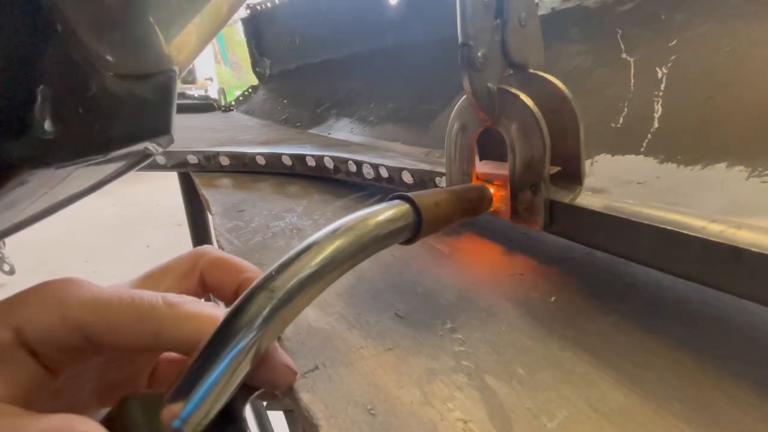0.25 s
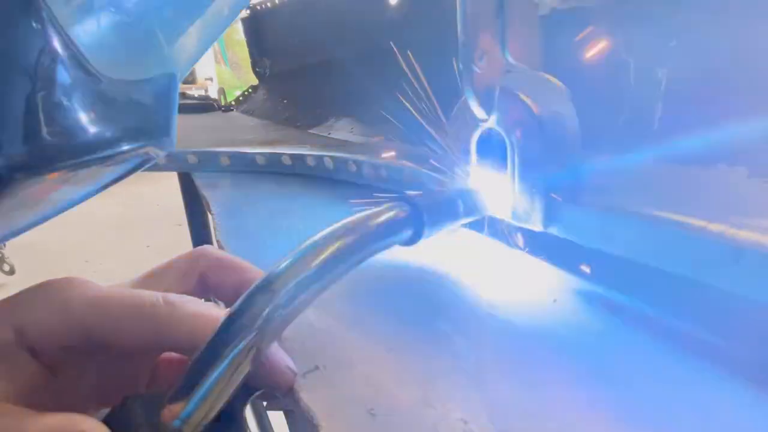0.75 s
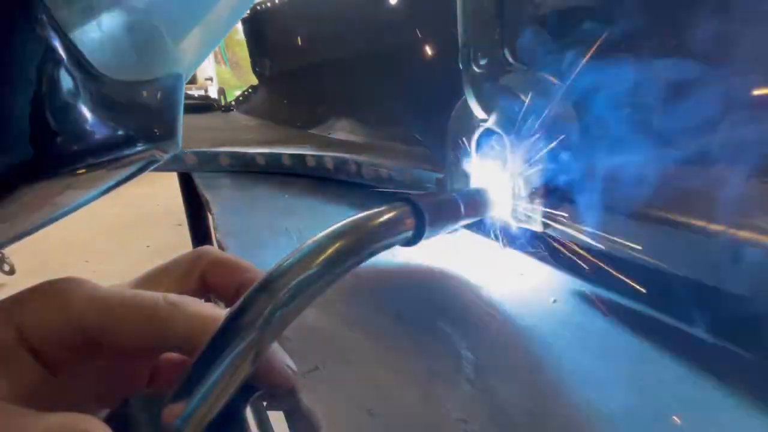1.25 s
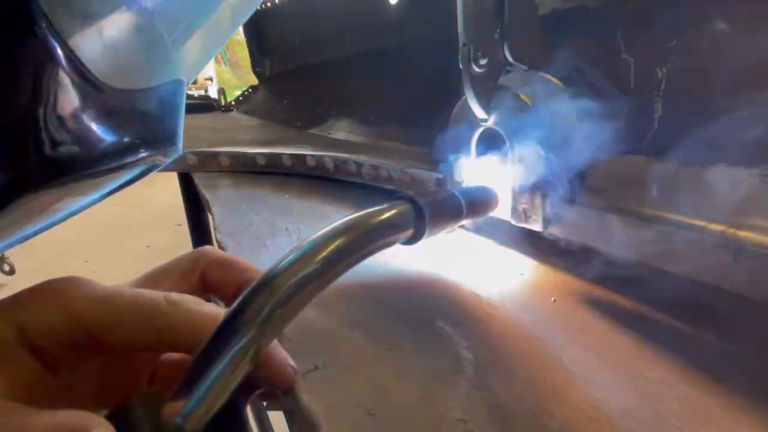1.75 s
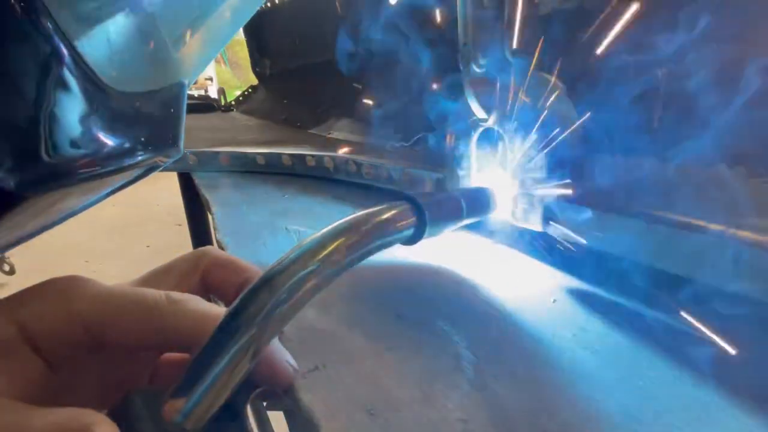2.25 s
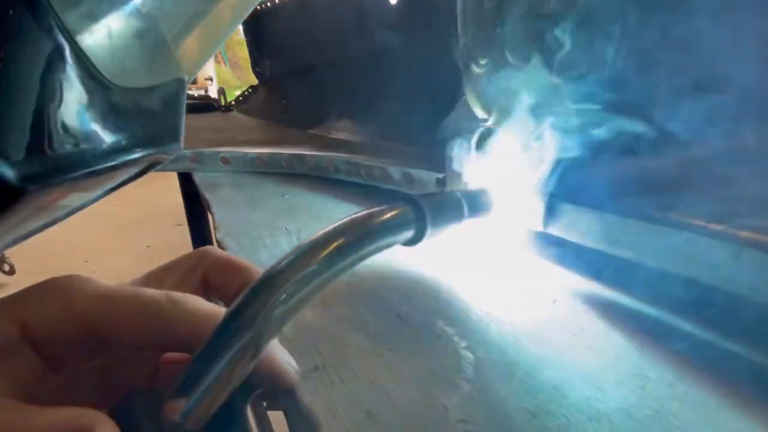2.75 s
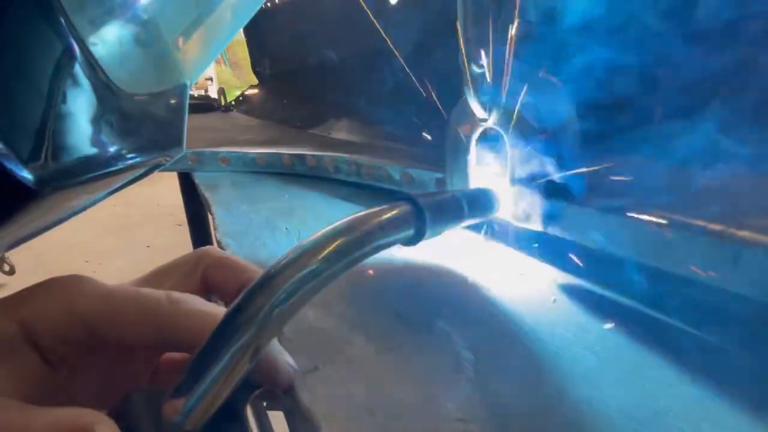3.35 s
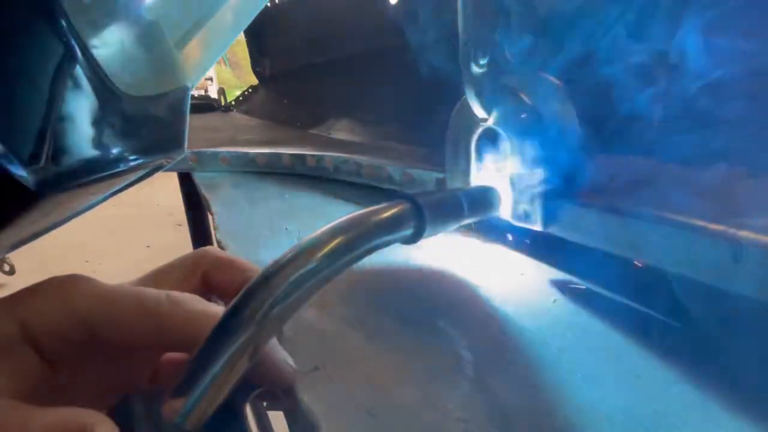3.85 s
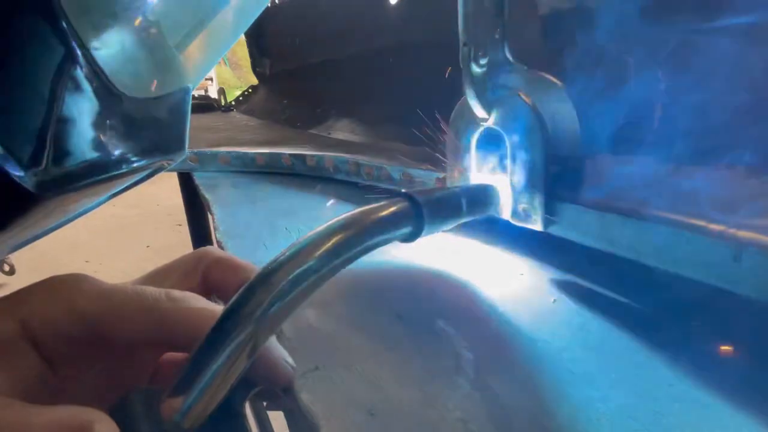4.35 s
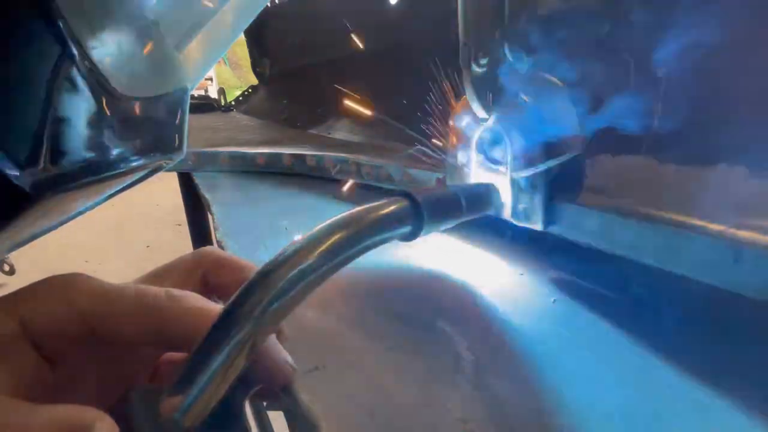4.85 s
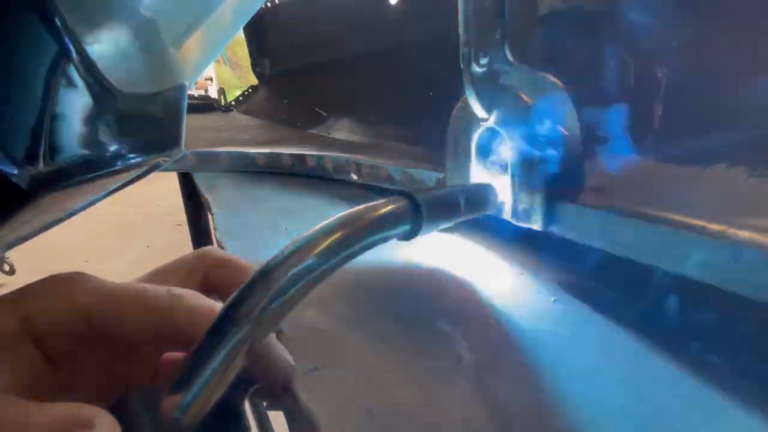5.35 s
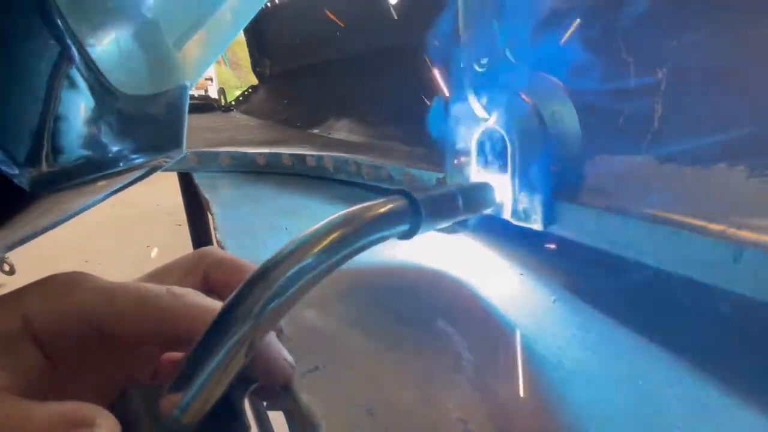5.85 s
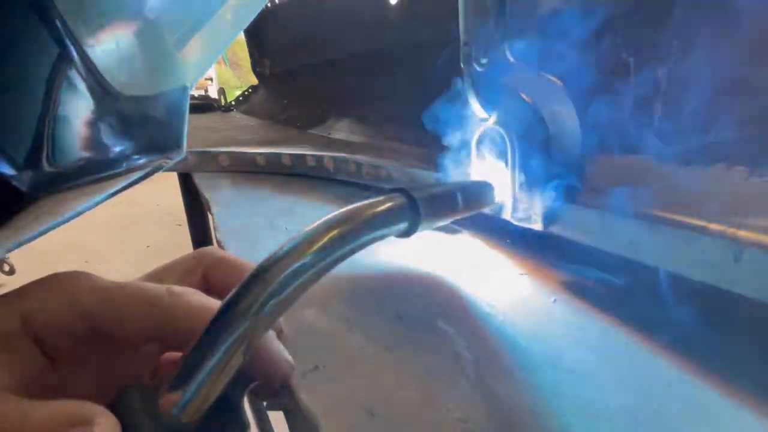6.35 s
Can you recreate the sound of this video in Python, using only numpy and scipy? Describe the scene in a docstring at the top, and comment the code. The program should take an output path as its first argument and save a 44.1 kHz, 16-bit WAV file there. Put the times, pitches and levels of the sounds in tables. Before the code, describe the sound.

Workshop, close small microphone: low room noise and a faint far fan hum. At 0.28 s a gas valve rattles with a metallic ring and a bright puff dies away. At 0.63 s the wire lurches and strikes weakly; sparse pops follow from 0.71. Loud, sharp crackling clusters run from 0.93 to 1.01 and 1.13 to 1.36, with low thuds and high sizzle between. From 1.39 to 1.93 the sizzle fades, narrows and swells again. A dense burst spits from 1.93 to 2.4, with a heavier thud near 2.17; hiss and two faint pops lead into near silence by 2.6. At 2.93 the long run starts, a rapid, ragged buzz of bright pops, loud until about 4.1, then falling by 4.3 to faint, irregular ticking crackle, slightly hollow near 5.9. It ends at 6.28; dim sizzle, then a small lurch and three pops from 6.52.

```python
"""Wire-feed welder in a workshop

Heard close to a small microphone. The gas valve rattles and puffs, then the wire lurches forward: shaped noise.
The wire shorts into the pool; each time the molten bridge bursts, the arc relights with a pop that rings
the hollow round it and a spit of hiss. Between the runs the arc and hot metal sizzle: hiss in two bands.
Low thuds sit under the heavier crackle; a fan hums far off as narrow bands of noise over room noise."""
import sys
import numpy as np
from scipy import signal
from scipy.fft import rfft, irfft, next_fast_len
from scipy.io import wavfile
from scipy.ndimage import uniform_filter1d

SR = 44100
rng = np.random.default_rng(int(sys.argv[2]) if len(sys.argv) > 2 else 0)


def pcm_store(signal):
    """Save signal as 16-bit PCM."""
    levels = np.round(np.clip(np.atleast_2d(signal), -1, 1) * 32767)
    wavfile.write(sys.argv[1], SR, levels.astype(np.int16).T)


N = 291501
T = np.arange(N) / SR

# room noise spectrum: [f/Hz, relative level per Hz/dB]
SHOP_SPECTRUM = [(30, -21.5), (150, -1.5), (230, -5.5), (310, 5), (450, -0.5), (1000, -7.5), (4000, -22),
                 (15000, -36.5)]
# tones of the distant fan: [f/Hz, rms level/dB]
FAN_TONES = [(274, -76), (367, -76.5), (581, -80.5), (818, -75.5), (1087, -83)]
# decay of the walls: [f/Hz, t60/s]
WALL_DECAY = [(500, 0.48), (14000, 0.099)]
# resonances of the gas valve body: [f/Hz, width/Hz, relative level/dB, t60/s]
VALVE_MODES = [(1001, 30, -16.5, 0.49), (2140, 59, -28.5, 0.33), (3810, 220, -7, 0.29),
               (4850, 520, -11, 0.3), (13360, 310, 4, 0.072)]
# spectrum of the gas puff: [f/Hz, relative level per Hz/dB]
PUFF_SPECTRUM = [(1500, -30.0), (4000, 18.0), (14000, 28.0)]
# lurches of the wire as it strikes: [t/s, f/Hz, width/Hz, level/dB, t60/s]
WIRE_LURCHES = [(0.628, 1600, 800, -60, 0.5), (0.64, 380, 170, -60, 2.5), (0.645, 180, 90, -63, 0.5),
                (6.522, 1900, 1300, -56, 0.6)]
# low thuds under the heavier crackle: [t/s, spread/s, level/dB]
LOW_THUDS = [(1.0, 0.023, -51), (1.27, 0.085, -61.5), (2.168, 0.028, -45.5), (2.331, 0.026, -68),
             (3.1, 0.073, -63), (3.45, 0.08, -68.5), (3.849, 0.22, -72)]
# spectrum of the thuds: [f/Hz, relative level per Hz/dB]
THUD_SPECTRUM = [(20, -7.0), (80, 2.5), (250, -7.0), (500, -36.0), (16000, -64.0)]
# hiss of the arc: [f/Hz, relative level per Hz/dB]
ARC_HISS = [(600, -11.5), (1100, -11), (1500, -23.5), (3200, -9.5), (7500, -8), (10500, -8), (12100, -4),
            (14000, -2.5)]
# arc or hot metal sizzling without pops, one list a stretch: [t/s, treble level/dB, middle over treble/dB]
SIZZLE_STRETCHES = [
    [(.622, -39, -1.5), (.712, -59.5, 8)],
    [(1.04, -49, -20), (1.09, -52, -24), (1.12, -19, -29)],
    [(1.39, -28.5, -9), (1.46, -36.5, -12), (1.5, -25.5, -20), (1.57, -47.5, -9.5), (1.66, -58, -7),
     (1.8, -51.5, -11), (1.812, -23.5, -24.5), (1.935, -22, -14.5)],
    [(2.44, -39.5, 1), (2.48, -47, -2), (2.5, -41, 2), (2.52, -58.5, 9), (2.6, -79, 6), (2.83, -78.5, 0.5),
     (2.885, -54, -6), (2.925, -24, -26)],
    [(5.8, -53, -14), (6.29, -60.5, -7.5), (6.512, -53.5, -8.5), (6.522, -47, 0), (6.61, -63, 4)],
]
# hollow of the steel bracket and nozzle, rung by each pop: [f/Hz, width/Hz, relative level/dB]
HOLLOW_MODES = [(344, 150, -33.5), (2860, 850, -20.5), (584, 70, -33.5), (1022, 56, -13), (3413, 290, -5),
                (4250, 590, -8), (6364, 370, -8), (8580, 530, -5), (10985, 790, -6.5), (12330, 440, -2),
                (13710, 480, 0.), (14840, 890, 0), (930, 330, -24.5)]
# booming or thinning of the hollow near one pitch under the pops: [t/s, spread/s, f/Hz, added level/dB]
MODE_SWELLS = [(1.152, 0.37, 343.4, 15.5), (2.2, 0.051, 430, 13), (1, .16, 1800, -19),
               (0.54, 0.085, 600, -18), (4.9, 1.2, 13360, -5), (5.88, 0.085, 600, 35),
               (6.15, 0.077, 602, 32), (4.7, 0.04, 600, 1), (5.7, 0.054, 2700, 16),
               (5.869, 0.045, 2960, 20), (7.6, 0.054, 3600, 22)]
# moments when the bridge bursts: [t/s]
POP_TIMES = [0.625, 0.7112, 0.75, 0.7877, 0.826, 0.932, 0.9561, 0.9682, 0.9775, 0.9878, 0.9984, 1.008,
             1.1278, 1.1433, 1.1524, 1.1731, 1.1955, 1.2142, 1.236, 1.2557, 1.2893, 1.3076, 1.3177, 1.3273,
             1.3369, 1.3502, 1.3607, 1.4325, 1.9327, 1.9544, 1.981, 2.0027, 2.0239, 2.0442, 2.0547, 2.0719,
             2.0937, 2.1236, 2.1459, 2.1713, 2.2103, 2.2289, 2.2485, 2.2675, 2.2811, 2.2959, 2.3073, 2.3192,
             2.3299, 2.3506, 2.3715, 2.3948, 2.4975, 2.5183, 2.9267, 2.9852, 3.0006, 3.0387, 3.0559, 3.0722,
             3.0888, 3.1052, 3.1222, 3.1392, 3.164, 3.1811, 3.1985, 3.2175, 3.2358, 3.2531, 3.2706, 3.288,
             3.3053, 3.3231, 3.3441, 3.3625, 3.3766, 3.3925, 3.4071, 3.4235, 3.4339, 3.4508, 3.4677, 3.4871,
             3.5046, 3.5234, 3.554, 3.5732, 3.6212, 3.6391, 3.6523, 3.6686, 3.6869, 3.7038, 3.7204, 3.745,
             3.7581, 3.7755, 3.7953, 3.8141, 3.8466, 3.8617, 3.8788, 3.896, 3.9107, 3.9427, 3.9681, 3.9859,
             4.0017, 4.0487, 4.0675, 4.0856, 4.1162, 4.1392, 4.1961, 4.2182, 4.2544, 4.2871, 4.3056, 4.3209,
             4.3402, 4.3635, 4.3839, 4.4032, 4.4229, 4.444, 4.4669, 4.5007, 4.5216, 4.5407, 4.5601, 4.5816,
             4.5989, 4.6545, 4.6853, 4.7116, 4.7722, 4.7866, 4.8165, 4.8635, 4.9075, 4.9266, 4.9598, 4.9881,
             5.0118, 5.0364, 5.0557, 5.0759, 5.1009, 5.1213, 5.1581, 5.1802, 5.2002, 5.212, 5.2287, 5.2489,
             5.2937, 5.3167, 5.3433, 5.3662, 5.3895, 5.4312, 5.446, 5.4762, 5.4991, 5.5324, 5.5544, 5.5927,
             5.6215, 5.6462, 5.6661, 5.6882, 5.7033, 5.7369, 5.7853, 5.8108, 5.8358, 5.8504, 5.8703, 5.8913,
             5.9228, 5.9823, 6.0038, 6.0456, 6.0665, 6.0988, 6.1224, 6.1373, 6.1617, 6.1836, 6.2072, 6.2304,
             6.2818, 6.5187, 6.5516, 6.5631]
# level of the pops, low in the later part as the arc moves behind the bracket: [t/s, relative level/dB]
POP_LEVELS = [(0.625, -23.5), (0.712, -8), (0.8, -3), (1.14, -2), (1.37, -4.5), (1.435, -36), (1.93, -8.5),
              (2.16, -1), (2.4, -3.5), (2.5, -25), (2.55, -33), (2.92, -4.5), (3.0, -7.5), (3.11, -2),
              (3.3, -5), (3.5, -5), (3.9, -7), (4.14, -11.5), (4.29, -21), (4.39, -19), (4.47, -16.5),
              (4.51, -25.5), (4.8, -28), (5.195, -28.5), (5.215, -21.5), (5.3, -27), (5.62, -29),
              (5.7, -23), (5.78, -28.5), (6.0, -26), (6.28, -29), (6.52, -18.5), (6.552, -20),
              (6.564, -15.5)]
# surfaces near the arc that throw each pop back: [delay/ms, level/dB]
PANEL_ECHOES = [(2.1, -15), (3.1, -16), (4.9, -17)]


def amp(db):
    """Gain of a level in dB."""
    return 10 ** (np.asarray(db) / 20)


def unit(x):
    """Scales to rms 1."""
    return x / np.sqrt(np.mean(x ** 2) + 1e-20)


def read(points, hz):
    """Reads a table along log frequency."""
    f, value = np.transpose(points)
    return np.interp(np.log(hz + 1), np.log(f + 1), value)


def band_filter(x, order, edge, kind="high"):
    """Butterworth filter, high-pass unless told otherwise; edge in Hz."""
    return signal.sosfilt(signal.butter(order, edge, kind, fs=SR, output="sos"), x)


def noise(points):
    """Steady noise of rms 1 with the given spectrum."""
    size = next_fast_len(N)
    colour = amp(read(points, np.fft.rfftfreq(size, 1 / SR)))
    white = rng.standard_normal(size)
    return unit(irfft(rfft(white) * colour, size)[:N])


def ring(x, hz, width):
    """One resonance with steep skirts and a soft start, gain 1 at its centre."""
    r = np.exp(-np.pi * width / SR)
    pole = [1, -r * np.exp(2j * np.pi * hz / SR)]
    return 2 * signal.lfilter([(1 - r) ** 2], np.convolve(pole, pole), x).real


def flicker(depth_db, ms):
    """Random gain of rms 1 that makes a sound come in clumps, as when the arc root jumps about."""
    length = max(int(ms * SR / 1000), 1)
    wander = unit(uniform_filter1d(rng.standard_normal(N), length))
    return unit(amp(depth_db * wander))


def shop(room_db=-69):
    """Room noise with the wavering tones of a fan, each a narrow band of noise."""
    tones = sum(amp(db) * unit(ring(rng.standard_normal(N), hz, 4.1)) for hz, db in FAN_TONES)
    return amp(room_db) * noise(SHOP_SPECTRUM) + tones


def walls(x):
    """A diffuse tail of decaying noise, each band dying at its own speed."""
    hz, t, bins = signal.stft(rng.standard_normal(SR // 2), SR, nperseg=256)
    decay = amp(-60 * t / read(WALL_DECAY, hz)[:, None])
    tail = signal.istft(bins * decay, SR, nperseg=256)[1]
    return signal.oaconvolve(x, tail / np.linalg.norm(tail))[:N]


def valve(start_s=0.28, body_db=-32.5, puff_db=-36.5):
    """The plunger rattles in its body and a puff of gas dies away; narrow modes take longer to build up."""
    t = np.maximum(T - start_s, 0)
    rattle = rng.standard_normal(N)
    body = np.zeros(N)
    for hz, width, db, t60 in VALVE_MODES:
        build_up = np.minimum(t * width / 2.24, 1) ** 2
        body += amp(db - 60 * t / t60) * unit(ring(rattle, hz, width)) * build_up
    puff = noise(PUFF_SPECTRUM) * np.minimum(t / 0.019, 1) * amp(-60 * t / 0.18)  # 19 ms rise, t60 0.18 s
    return amp(body_db) * body * flicker(1.3, 3.3) + amp(puff_db) * puff


def feeder():
    """Each lurch of the wire is a burst of noise through one broad resonance, dying away."""
    out = np.zeros(N)
    for start_s, hz, width, db, t60 in WIRE_LURCHES:
        t = np.maximum(T - start_s, 0)
        rise = np.minimum(t * hz / 10, 1)  # over ten cycles
        out += amp(db - 60 * t / t60) * unit(ring(rng.standard_normal(N), hz, width)) * rise
    return out


def thuds():
    """Uneven low puffs of noise, as hot gas from the arc reaches the microphone."""
    power = sum(amp(2 * db) * np.exp(-((T - s) / spread) ** 2) for s, spread, db in LOW_THUDS)
    return np.sqrt(power) * noise(THUD_SPECTRUM) * flicker(4.5, 15.)


def hollow(x):
    """The cavity round the arc colours whatever sounds inside it; the modes alternate in sign down the table."""
    return sum((-1) ** k * amp(db) * ring(x, hz, width) for k, (hz, width, db) in enumerate(HOLLOW_MODES))


def sizzle():
    """Arc and hot-metal hiss, its treble and middle bands riding separate level curves."""
    hiss = noise(ARC_HISS)
    hiss = hiss + hollow(hiss) * 2
    lull = np.exp(-((T - 1.72) / 0.15) ** 2)
    narrow = (1 - .8 * lull) * hiss + 4. * lull * ring(hiss, 4200, 650)  # the middle narrows around 1.72 s
    treble = unit(band_filter(hiss, 4, 11000))
    middle = unit(band_filter(narrow, 4, [2500, 9500], "band"))
    out = np.zeros(N)
    for rows in SIZZLE_STRETCHES:
        s, treble_db, middle_db = np.transpose(rows)
        edges = np.clip(np.minimum(T - s[0], s[-1] - T) / 0.0066, 0, 1)  # 6.6 ms fades
        mix = treble + amp(np.interp(T, s, middle_db)) * middle
        out += edges * amp(np.interp(T, s, treble_db)) * mix
    return out * flicker(0.89, 0.9)


def pop_snaps(at, pop_db, vary_db=1.74, low_db=-3.5):
    """Each burst rings every mode of the hollow, with some luck in how hard each one is struck."""
    luck = rng.standard_normal((len(at), len(HOLLOW_MODES)))
    snaps, n = np.zeros(N), np.arange(2048)
    for k, (hz, width, mode_db) in enumerate(HOLLOW_MODES):
        swell_db = sum(up_db * np.exp(-((at / SR - when) / spread) ** 2 - (6.1 * np.log(hz / boom_hz)) ** 2)
                       for when, spread, boom_hz, up_db in MODE_SWELLS)
        train = np.zeros(N)
        train[at] = amp(pop_db + mode_db + vary_db * luck[:, k] + swell_db)
        decay = np.pi * width / SR
        start = amp(low_db) if hz < 5000 else decay * n  # low modes are kicked at once, high ones build up
        mode = 2 * decay * start * np.exp(-decay * n) * np.sin(2 * np.pi * hz * n / SR)
        mode = band_filter(mode, 2, 0.58 * hz)  # a tiny spark moves no bass
        snaps += signal.oaconvolve(train, mode)[:N]
    return snaps


def pop_spits(at, pop_db, neck_ms=1.13, spit_ms=2.13, burn_db=-13.0, burn_ms=20.6):
    """Hiss swells as the bridge necks, spits at the burst and burns on fainter; times shape its power."""
    power = np.zeros(N)
    power[at] = amp(2 * pop_db)
    ms = np.arange(-8000, 8001) * 1000 / SR
    after = np.exp(-abs(ms) / spit_ms) + amp(2 * burn_db) * np.exp(-abs(ms) / burn_ms)
    shape = np.where(ms < 0, np.exp(-abs(ms) / neck_ms), after)
    envelope = np.sqrt(abs(signal.oaconvolve(power, shape, "same")))
    hiss = noise(ARC_HISS)
    hiss = unit(hiss + 0.16 * hollow(hiss))
    return band_filter(envelope * hiss * flicker(1.3, 1.0), 6, 540.)


def pops(snap_db=24.5, spit_db=-10.5, cold_db=-2.5, cold_s=0.043):
    """Bursting bridges: a snap inside a spit of hiss, thrown back by nearby surfaces."""
    s = np.ravel(POP_TIMES)
    at = np.round(s * SR).astype(int)
    pop_db = np.interp(s, *np.transpose(POP_LEVELS))
    wait = np.diff(s, prepend=0)
    pop_db += cold_db * np.minimum(wait / cold_s, 1) ** 2  # weaker after a wait, fully so from cold_s on
    direct = amp(snap_db) * pop_snaps(at, pop_db) + amp(spit_db) * pop_spits(at, pop_db)
    echoes = sum(amp(db) * np.roll(direct, int(delay * SR / 1000)) for delay, db in PANEL_ECHOES)
    return direct + echoes


def scene():
    """The arc with its room tail, and the small sounds round it."""
    arc = pops()
    return (shop() + amp(-17.5) * walls(arc) + valve() + feeder() + thuds() + sizzle() + arc)[None]


def record(dry):
    """Loud pops overload the microphone softly and push its diaphragm into low thumps; then the band limit."""
    thump = band_filter(dry ** 2, 4, [20, 55.], "band")
    squash = .85 * np.tanh(dry / .85) - dry
    bent = dry + band_filter(squash, 4, 500.) + 0.011 * thump
    low_pass = signal.firwin(1023, 15800, window=("kaiser", 9), fs=SR)  # edge in Hz
    return signal.oaconvolve(bent, low_pass[None], "same")


dry = scene()
out = record(dry)
pcm_store(out)
```